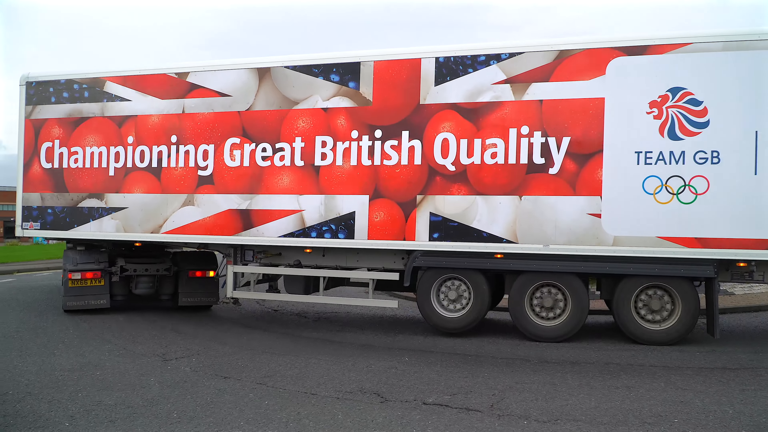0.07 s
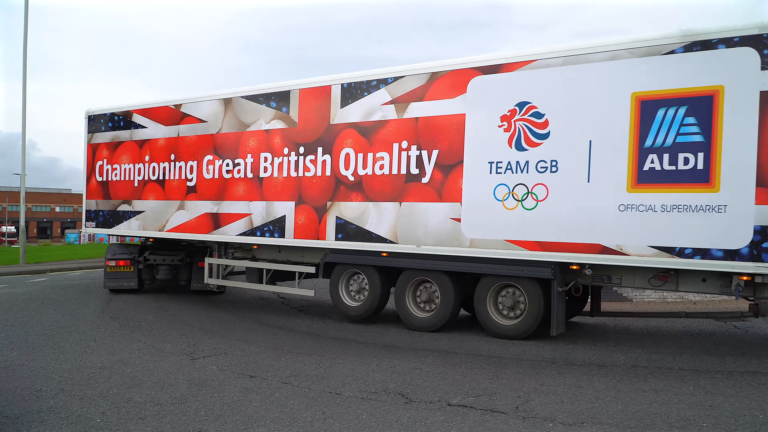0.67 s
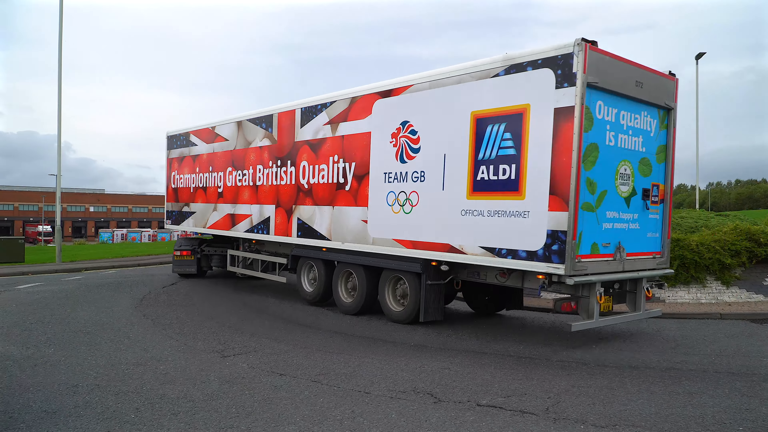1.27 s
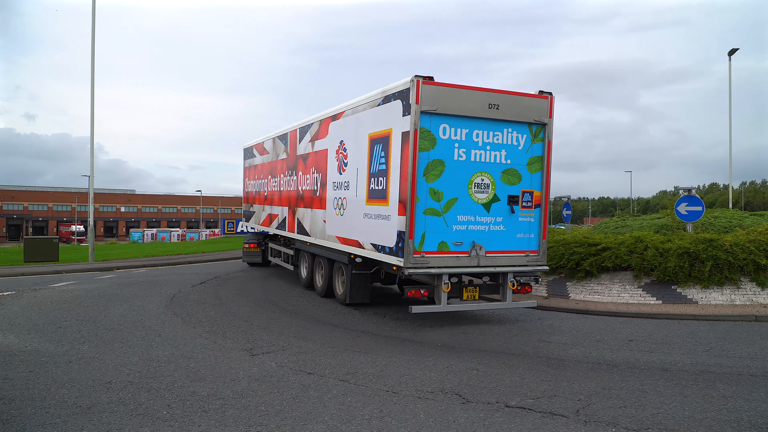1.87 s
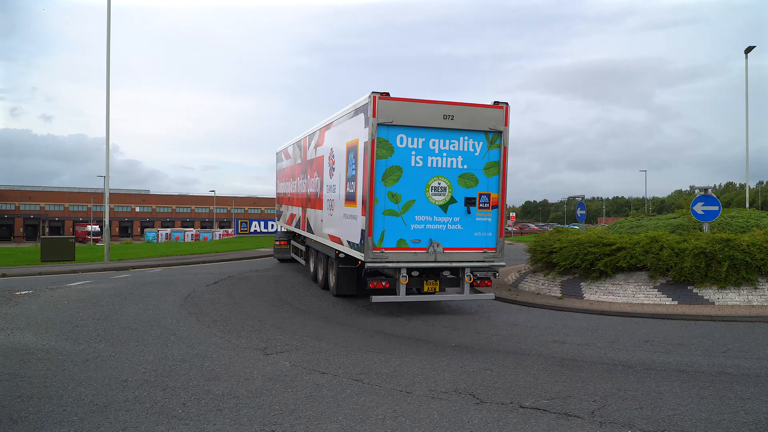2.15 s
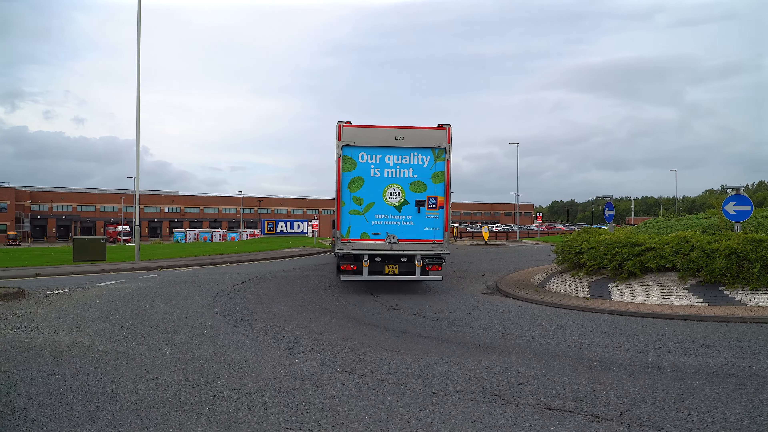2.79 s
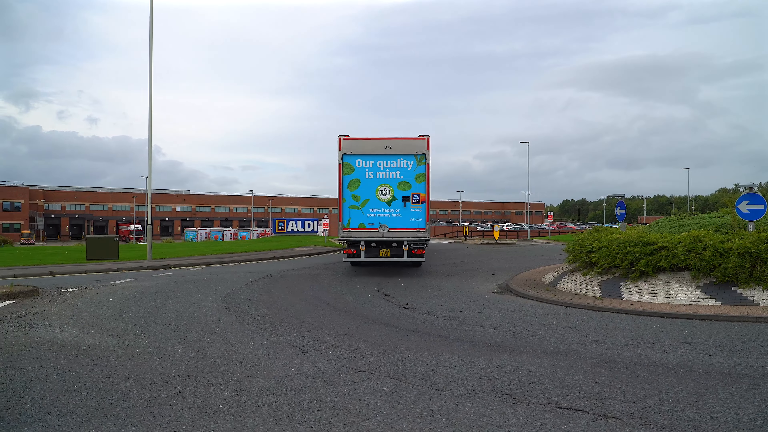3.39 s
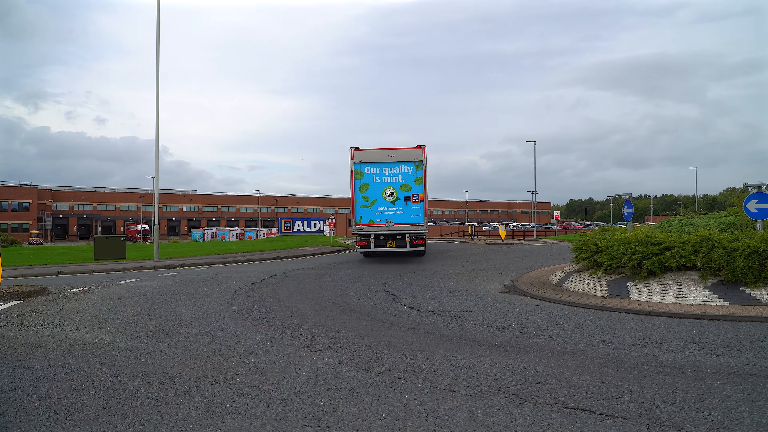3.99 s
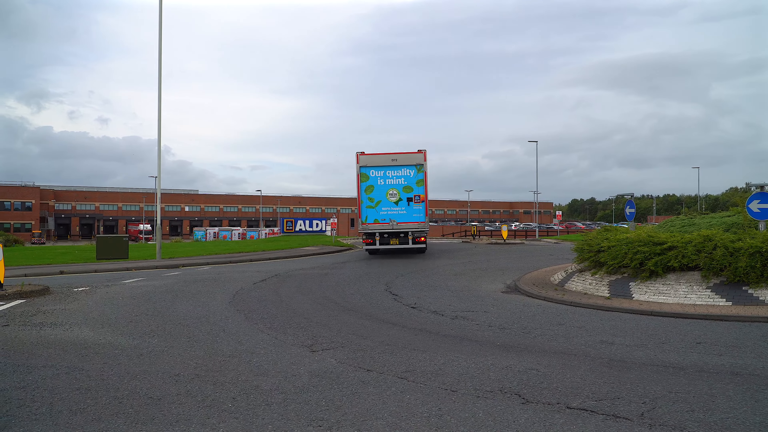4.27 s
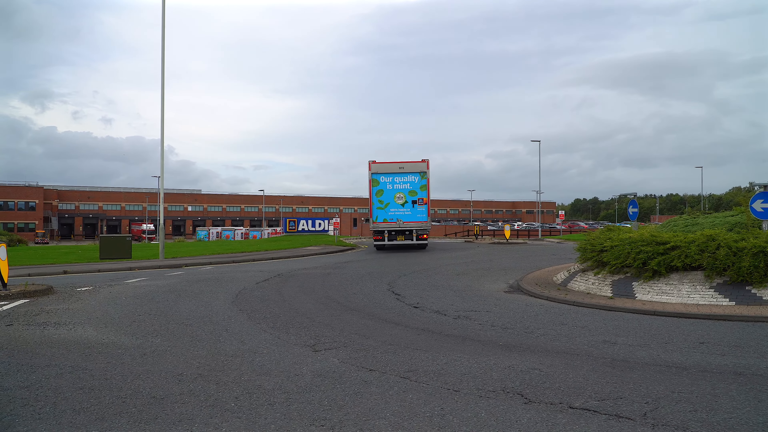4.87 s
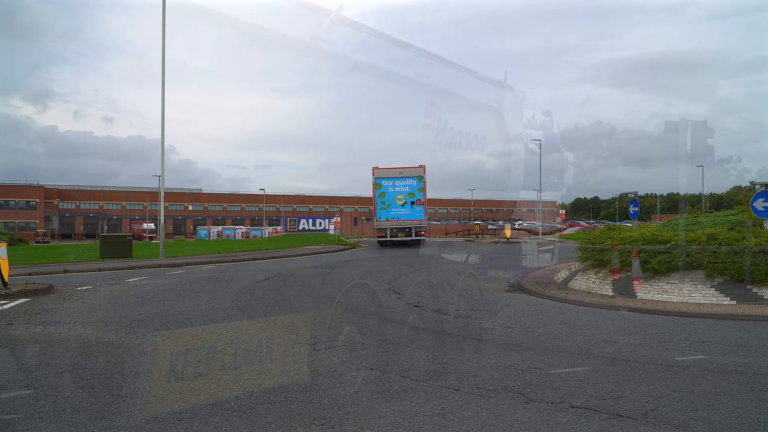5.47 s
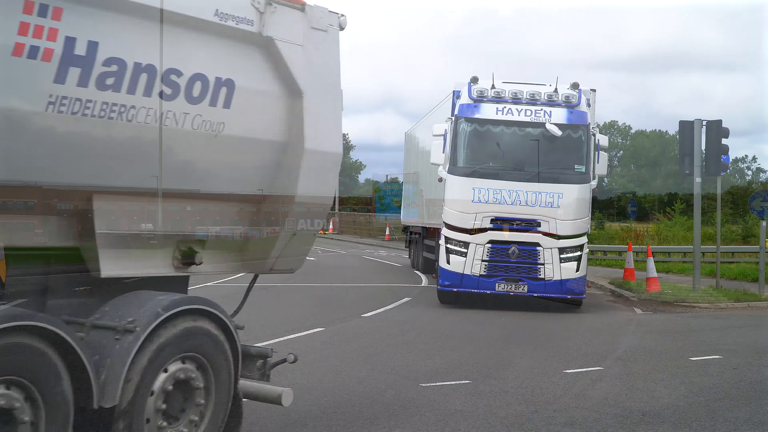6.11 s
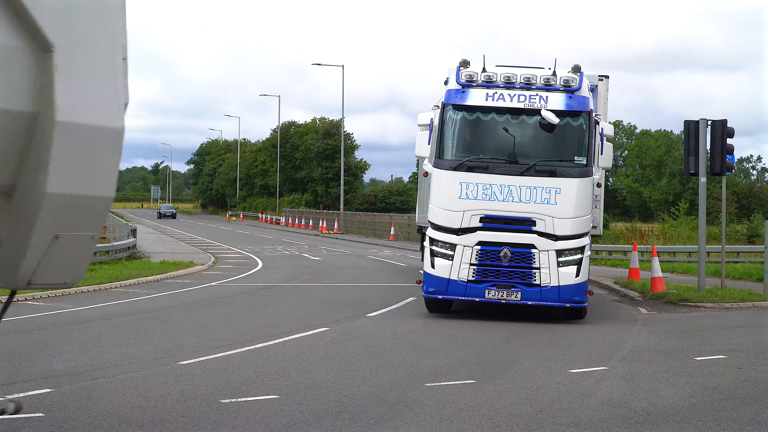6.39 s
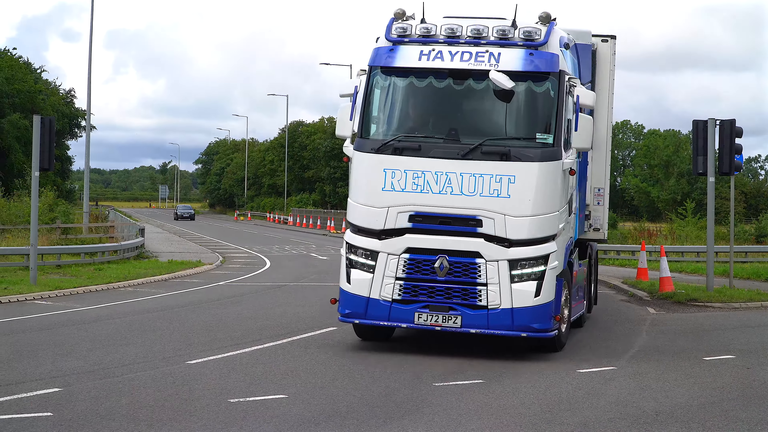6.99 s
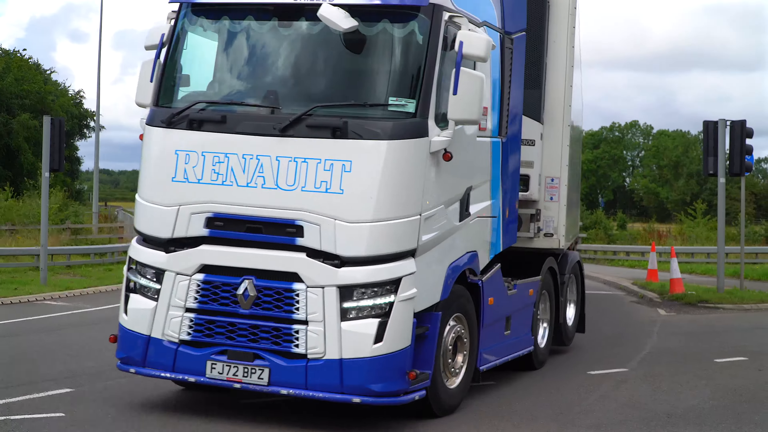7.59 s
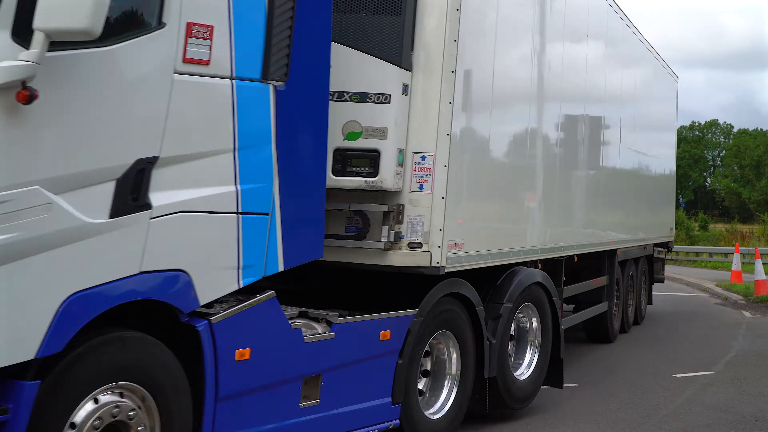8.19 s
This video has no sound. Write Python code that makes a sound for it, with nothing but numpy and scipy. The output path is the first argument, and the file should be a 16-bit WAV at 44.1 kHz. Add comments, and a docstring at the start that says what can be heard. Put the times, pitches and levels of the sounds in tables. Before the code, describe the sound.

Wind thumps the microphone as a clanking lorry recedes, followed by louder tyre roar and diesel drone from two close lorries.

```python
"""Diesel lorries at a windy roundabout.

A lorry pulls away round the bend, tyres singing in stick-slip and trailer panels ringing, while eddies
buffet the microphone and a far diesel ticks over. This dissolves to a closer spot: a tipper rolls past
on the left and a refrigerated lorry nears, its engine gathering speed. Exhausts sound at multiples of
their firing rates; tyres make broadband noise that weakens with distance."""
import sys
import numpy as np
from scipy import signal
from scipy.fft import rfft, irfft
from scipy.io import wavfile
from scipy.ndimage import uniform_filter1d, minimum_filter1d

SR = 44100
rng = np.random.default_rng(int(sys.argv[2]) if len(sys.argv) > 2 else 0)


def transcribe(u):
    """Save the signal u as a 16-bit wav file named by the first command-line argument.

    u: samples, shape (n,) or (channels, n), limited to [-1, 1]; the rate is SR.
    q: integer samples, one column per channel.
    """
    v = np.clip(np.atleast_2d(u).T, -1, 1)
    q = np.round(v * 32767).astype(np.int16)
    wavfile.write(sys.argv[1], SR, q)


N = 363825
TIME, FREQS = np.arange(N) / SR, np.fft.rfftfreq(N, 1 / SR)

# straight paths past the microphone: nearest_m, speed_m_per_s
LEAVING_PATH, TIPPER_PATH, NEARING_PATH = (8.38, 5.82), (3.8, 6.8), (8.2, 3.7)
# sound from ahead at the two microphone ports: frequency_hz, coherence, left_over_right_db, left_lead_rad
FRONTAL_PORTS = [(60, 1, 1, 0), (304, 0.89, 2, 0.0092), (1200, 1, 1, 0.011), (3060, 0.59, 1.5, 0),
                 (7000, 0.49, 0, 0), (15000, 0.091, 1, 0.0012)]
# sound from the side: the same columns
OBLIQUE_PORTS = [(60, 1, 10, 1.5), (154, 0.22, -0.5, -1), (597, 0.55, 4.5, 0.04), (1340, 0.92, -0.5, 0.94),
                 (2600, 0.4, 2, 1.44), (4740, 0.45, -0.5, 3), (9100, 0.24, 3, 8.5), (15200, 0.35, 4, 12.5)]
# spectrum of wind pressure: frequency_hz, density_db
WIND_COLOUR = [(6, -12), (13, 0), (26, 1), (45, -6.5), (68, -14), (100, -25), (200, -38), (500, -60),
               (2000, -100)]
# the approaching engine: time_s, firing_hz, level_db
NEARING_ENGINE = [(6.1, 74, -48), (6.85, 76, -31), (7.2, 78, -31), (7.45, 80.7, -26), (7.7, 82, -27),
                  (7.95, 83.5, -23), (8.1, 84, -23), (8.25, 85.5, -23.5)]


def gain_of(db):
    """Decibels to amplitude."""
    return 10 ** (np.asarray(db) / 20)


def unit_rms(x):
    """Normalisation to rms 1."""
    return x / np.sqrt(np.mean(x ** 2) + 1e-20)


def over_time(rows):
    """Linear interpolation of each column in time."""
    times, *columns = np.transpose(rows)
    return [np.interp(TIME, times, c) for c in columns]


def over_frequency(rows, hz):
    """Interpolation of each column on log frequency."""
    freqs, *columns = np.transpose(rows)
    return [np.interp(np.log(hz + 1), np.log(freqs + 1), c) for c in columns]


def coloured(x, colour):
    """Spectral shaping, to rms 1."""
    return unit_rms(irfft(rfft(x) * gain_of(over_frequency(colour, FREQS)[0]), N))


def wander(width_hz):
    """Random fluctuation: low-pass Gaussian noise of rms 1."""
    return unit_rms(irfft(rfft(rng.standard_normal(N)) * np.exp(-(FREQS / width_hz) ** 2), N))


def panned(side_db):
    """Level difference, left over right, as two gains whose mean is 1."""
    gains = gain_of(np.array([np.atleast_1d(side_db), -np.atleast_1d(side_db)]) / 2)
    return gains / gains.mean(0)


def swell(peak_s, half_s, db):
    """A bell-shaped amplitude envelope."""
    return gain_of(db) / (1 + ((TIME - peak_s) / half_s) ** 2 / 2) ** 2


def passing(path, nearest_s, db, loss_db):
    """Propagation loss: a passing source's level falls by loss_db per doubling of distance."""
    nearest_m, speed = path
    return db - loss_db * np.log2(np.hypot(1, speed * (TIME - nearest_s) / nearest_m))


def narrowband(hz, width_hz):
    """A noisy resonance: random quadrature modulation of a carrier that follows a pitch curve."""
    phase = 2 * np.pi * np.cumsum(hz) / SR
    return wander(width_hz) * np.cos(phase) + wander(width_hz) * np.sin(phase)


def port_noise(colour, ports, patchy_db, flicker_db):
    """Partly coherent noise at two ports, its level uneven in time and frequency."""
    frames, hz = N // 256 + 5, np.fft.rfftfreq(1024, 1 / SR)
    a, b, c, d, patches, flicker = rng.standard_normal((6, frames, len(hz)))
    patches = unit_rms(uniform_filter1d(uniform_filter1d(patches, size=14, axis=0), size=7, axis=1))
    flicker = unit_rms(uniform_filter1d(uniform_filter1d(flicker, size=3, axis=0), size=70, axis=1))
    coherence, side_db, lead_rad = over_frequency(ports, hz)
    coherence = np.clip(coherence, 0, 1)
    left = a + 1j * b
    right = (coherence * left + np.sqrt(1 - coherence ** 2) * (c + 1j * d)) * np.exp(-1j * lead_rad)
    unevenness = gain_of(patchy_db * patches + flicker_db * flicker)
    spectra = np.array([left, right]) * panned(side_db)[:, None] * unevenness
    _, noise = signal.istft(spectra.swapaxes(1, 2), nperseg=1024, noverlap=768)
    return coloured(noise[:, :N], colour)


def rolling_bands(noise, levels_db, splits_hz):
    """Frequency-dependent attenuation: each band carries differently with distance and shielding."""
    lowpasses = [0] + [1 / (1 + (FREQS / hz) ** 8) for hz in splits_hz] + [1]
    bands = [irfft(rfft(noise) * (hi - lo), N) for lo, hi in zip(lowpasses, lowpasses[1:])]
    return [gain_of(db) * band / band.mean(0).std() for db, band in zip(levels_db, bands)]


def ground_dip(noise, start_s=2.4, full_s=3.3, centre_hz=345, width_hz=103, depth_db=-5):
    """Destructive interference: the ground reflection weakens the low mids of a distant source."""
    far = np.clip((TIME - start_s) / (full_s - start_s), 0, 1)
    low_mids = irfft(rfft(noise) * np.exp(-((FREQS - centre_hz) / width_hz) ** 2), N)
    return noise - (1 - gain_of(far * depth_db)) * low_mids


def exhaust(running, orders, roughness, jitter):
    """Engine orders share one crankshaft; uneven combustion modulates their amplitude and pitch."""
    firing_hz, level_db = over_time(running)
    phase = 2 * np.pi * np.cumsum(firing_hz * (1 + jitter * wander(8.64))) / SR
    tone = sum(gain_of(db) * (1 + roughness * wander(5.9)) * np.cos(k * phase + 2 * np.pi * rng.random())
               for k, db in orders)
    return gain_of(level_db) * unit_rms(tone)


def firing_pulses(hz, sharpness):
    """Amplitude modulation by combustion: one crest per firing, rms 1."""
    return unit_rms(np.exp(sharpness * np.cos(2 * np.pi * np.cumsum(hz) / SR)))


def rattle(ticks_per_s=40, spread_db=-1.0):
    """Random impacts of loose fittings, each a brief decay of resonant noise."""
    struck = rng.random((2, N)) < ticks_per_s / SR
    clicks = struck * gain_of(spread_db * np.minimum(rng.exponential(1, (2, N)), 2))
    clicks = clicks + .6 * clicks[::-1]  # each port also hears the other's ticks
    ring = rng.standard_normal(900) * np.exp(-TIME[:900] / .003)
    # resonances of the fittings: frequency_hz, density_db
    colour = [(250, -36), (550, 1.5), (1300, -33), (2000, -4), (2800, -15), (4500, -12.5),
              (9000, -47), (15000, -77)]
    return coloured(signal.oaconvolve(clicks, ring[None])[:, :N], colour)


def trailer_knocks(metal_t60_s=.16):
    """Modal ringing: each blow excites a cluster of damped panel modes and sets loose metal buzzing."""
    # sharp onsets: start_s, level_db, pitch_hz, spread_hz, t60_s; blows on the trailer, except the one at 0.683
    # s, where the level snaps back after a gust
    blows = [(.005, -24.5, 1125, 405, 0.079), (.039, -20.5, 1076, 245, .11), (.055, -20.5, 990, 246, 0.15),
             (.073, -24, 1044, 304, 0.13), (0.093, -22, 1207, 305, 0.1), (.136, -21.5, 1040, 303, .1),
             (.216, -22, 1000, 496, 0.088), (.247, -20.5, 1157, 346, 0.071), (.277, -22, 1270, 150, 0.1),
             (.299, -29, 1280, 150, .08), (.333, -22, 1274, 151, .11), (.364, -19, 1240, 200, 0.072),
             (.385, -25, 1223, 151, .12), (.426, -23.5, 1195, 397, .08), (0.444, -21.5, 1204, 150, 0.1),
             (.478, -27, 1210, 200, .1), (.508, -21, 1210, 250, 0.12), (.586, -21.5, 1126, 198, 0.065),
             (.683, -17.5, 1156, 352, .09), (.755, -16.5, 1094, 346, .09), (.8, -21.5, 1150, 400, 0.1),
             (.929, -26.5, 720, 200, 0.12), (1.045, -27.5, 1110, 300, .1), (1.07, -24, 1080, 302, 0.11),
             (1.116, -28, 750, 300, .1), (1.135, -24, 1280, 251, 0.074), (1.171, -20.5, 860, 450, .09),
             (1.19, -27, 1275, 296, .08), (1.228, -21, 763, 150, 0.085), (1.448, -29, 657, 150, .12),
             (1.645, -24, 700, 301, 0.13), (1.691, -27.5, 1490, 602, 0.11), (1.811, -21.5, 1052, 442, 0.15),
             (1.939, -24.5, 540, 79.6, 0.16), (2.022, -22, 712, 150, 0.076), (2.127, -18, 860, 444, 0.075),
             (2.236, -28, 604, 150, 0.075), (2.569, -27, 360, 30, .18)]
    # modes of the loose metal: pitch_hz, relative_db
    metal_modes = [(1900, -20.5), (2080, -22), (2450, -19.5), (2700, -21), (2990, -18), (3380, -24),
                   (3900, -24)]
    nearest_m, speed = LEAVING_PATH
    age, knocks = TIME[:SR // 2], np.zeros(N)
    for start_s, level_db, pitch_hz, spread_hz, t60_s in blows:
        envelope = (1 - np.exp(-age / .0025)) * gain_of(-60 * age / t60_s)
        cluster_hz = pitch_hz + spread_hz * (np.linspace(-1, 1, 7) + rng.uniform(-.15, .15, 7))
        panel = envelope * sum(np.sin(2 * np.pi * (hz * age + rng.random())) for hz in cluster_hz)
        metal = sum(gain_of(db) * np.sin(2 * np.pi * (hz * rng.uniform(.96, 1.04) * age + rng.random()))
                    for hz, db in metal_modes)
        distance_db = -9 * np.log2(np.hypot(1, start_s * speed / nearest_m))
        metal *= gain_of(distance_db - 60 * age / metal_t60_s)
        onset = round(start_s * SR)
        knocks[onset:onset + len(age)] += gain_of(level_db) * (unit_rms(panel) * envelope.std() + metal)
    return knocks


def tyre_scrub():
    """Stick-slip friction: cornering rubber grips and lets go, singing in short glides."""
    # swells of sideways slip: peak_s, half_length_s, pitch_hz, glide_hz_per_s, level_db
    slips = [(0.378, 0.25, 1285, -190, -36), (0.562, .1, 506, 13.5, -38), (1.318, 0.2, 533, 30, -39.5),
             (1.728, 0.31, 1175, 56, -35), (1.723, .2, 622, 62, -35), (2.001, 0.24, 546, 150.5, -35),
             (2.223, 0.12, 637, 80, -40), (2.55, 0.29, 483, -21.5, -46)]
    jerks = unit_rms(gain_of(1.7 * wander(45)))
    song = np.zeros(N)
    for peak_s, half_s, hz, glide, db in slips:
        pitch_hz = hz + glide * np.clip(TIME - peak_s, -.5, .5)
        song += swell(peak_s, half_s, db) * narrowband(pitch_hz, width_hz=.12 * hz)
    return jerks * song


def leaving_lorry():
    """A receding source: tread on uneven asphalt, exhaust and trailer fade with distance."""
    # spectrum of its rolling noise: frequency_hz, density_db
    colour = [(40, -32), (80, 1.5), (140, -8.5), (215, -2.5), (255, -12), (370, -17), (520, -12),
              (670, -11.5), (900, -16), (1260, -12.5), (1650, -22.5), (2200, -32.5), (3200, -32),
              (4900, -38.5), (10900, -62.5), (15500, -99)]
    # rumble, roar, hiss and fizz: loudest_s, level_db, loss_db_per_doubling
    bands = [(2.1, -36, 3.5), (0.92, -30, 7.5), (1.14, -40.5, 7.5), (0.94, -51.5, 13)]
    # swells of the treble: peak_s, half_length_s, relative_db
    fizz_swells = [(2.182, 0.086, -3), (2.65, 0.047, -5), (3.557, .2, 0), (4.35, 0.21, 6), (5.062, .11, 4)]
    # its engine: time_s, firing_hz, level_db
    running = [(0, 55, -49), (1.2, 53, -51), (2.0, 68, -32), (2.4, 71, -34.5), (2.68, 71, -32.5),
               (3.0, 78, -36.5), (3.6, 73.5, -36), (3.97, 74, -34), (4.15, 74, -41), (5.0, 61.4, -41.5),
               (5.9, 59, -45)]
    # exhaust partials: firing_multiple, relative_db
    orders = [(.667, -12), (.833, -2), (1, -4.5), (1.167, -5), (1.332, -7), (1.666, -5), (1.801, -5),
              (2, 2), (2.668, -7), (3, -14), (4, -13), (4.5, -14), (5, -17), (6, -13.5)]
    noise = ground_dip(port_noise(colour, FRONTAL_PORTS, patchy_db=1.23, flicker_db=.96))
    levels_db = [passing(LEAVING_PATH, *band) for band in bands]
    rumble, roar, hiss, fizz = rolling_bands(noise, levels_db, splits_hz=[260, 1800, 5600])
    hiss *= firing_pulses(over_time(running)[0], sharpness=.048)
    fizz *= 1 + sum(swell(*row) for row in fizz_swells)
    pitched = tyre_scrub() + trailer_knocks() + exhaust(running, orders, roughness=.5, jitter=.012)
    fittings = gain_of(passing(LEAVING_PATH, nearest_s=.086, db=-41.5, loss_db=16)) * rattle()
    return rumble + roar + hiss + fizz + fittings + panned(2.9) * pitched


def gust(full_s, hold_s, db, side_db, rise_s=.061, fall_db_per_s=133):
    """Pressure envelope of a gust at each port: linear rise, hold, exponential decay."""
    rise = np.clip(1 + (TIME - full_s) / rise_s, 0, 1)
    return panned(side_db) * rise * gain_of(db - fall_db_per_s * np.maximum(TIME - full_s - hold_s, 0))


def wind(lull_db=-35, flutter_db=-10.5):
    """Turbulence presses hardest on the windward port; strong gusts shed smaller, faster eddies."""
    # gusts on the microphone: full_s, hold_s, level_db, left_over_right_db
    gusts = [(0, 0.09, -9.5, 1), (0.103, 0.018, -7.5, 11), (0.157, 0.029, -3, 10), (0.235, 0.03, -12, -4),
             (0.309, .012, -9, 10), (0.43, 0.025, -9, 5), (0.533, 0.08, -13.5, 3), (0.664, 0.038, -9.5, 12),
             (0.786, 0.033, -11, 5), (0.96, 0.24, -17.5, 5), (1.197, 0.19, -15.5, 4.5),
             (1.46, 0.11, -20, 5), (1.648, 0.035, -15, 5), (1.824, 0.22, -20.5, 9),
             (2.278, 0.02, -14.5, 12), (2.378, 0.072, -13, 5), (2.536, 0.07, -13, 9),
             (2.706, 0.051, -22, 6), (2.832, 0.041, -11.5, 7.5), (3.169, 0.047, -23, 19),
             (4.31, 0.31, -22.5, 7), (4.717, 0.025, -13, 1), (4.823, 0.1, -9, 3), (4.96, 0.069, -11.5, 5),
             (5.11, 0.088, -23.5, -5), (5.391, 0.061, -20, 7), (5.53, 0.16, -19, 8)]
    # spectrum of the small eddies: frequency_hz, density_db
    flutter_colour = [(25, -15), (48, -1), (80, -1.5), (120, -13), (300, -34), (1500, -85)]
    force = np.hypot(gain_of(lull_db) * panned(8.5), np.max([gust(*row) for row in gusts], axis=0))
    eddies = coloured(rng.standard_normal((2, N)) + .7 * rng.standard_normal(N), WIND_COLOUR)
    eddies /= np.sqrt(uniform_filter1d(eddies ** 2, size=3000) + .1)  # steadied, so gusts set the level
    shedding = gain_of(flutter_db) * force.mean(0) ** 1.2
    flutter = shedding * coloured(rng.standard_normal((2, N)), flutter_colour)
    thumps = unit_rms(gain_of(wander(23)))
    return force * (unit_rms(eddies) + thumps * flutter)


def idling_diesel():
    """Combustion knock: noise pulsed at the firing rate is all that carries from a far engine."""
    # the idling engine: time_s, firing_hz, level_db
    running = [(3.6, 45.5, -39), (4.4, 39, -41.5), (5.0, 42, -42), (5.5, 38, -43.5), (6.0, 40, -55)]
    # spectrum of diesel knock: frequency_hz, density_db
    colour = [(150, -7), (260, -9), (380, -9), (540, 7.5), (980, 5), (1270, 10), (1580, -3.5), (2300, -7),
              (2950, 1), (3500, -9), (4500, -19), (7000, -20.5), (15000, -38.5)]
    firing_hz, level_db = over_time(running)
    noise = rng.standard_normal(N) + .74 * rng.standard_normal((2, N))
    return gain_of(level_db) * coloured(noise * firing_pulses(firing_hz, sharpness=.33), colour)


def tipper():
    """A close pass: the exhaust falls in pitch, and the tyres' sizzle dies steeply with distance."""
    # its engine: time_s, firing_hz, level_db
    running = [(5.4, 58, -41), (5.9, 59, -31.5), (6.28, 66.4, -27), (6.53, 55.3, -26), (6.9, 54, -32),
               (7.2, 49.6, -31), (8.25, 48, -47)]
    # exhaust partials: firing_multiple, relative_db
    orders = [(1.667, -11), (2, 2.5), (2.33, 1.5), (4, -9)]
    # spectrum of tyre sizzle: frequency_hz, density_db
    colour = [(4000, -23), (8000, -12), (10000, -1), (12000, 3), (14000, -4), (15700, -10)]
    sizzle_db = passing(TIPPER_PATH, nearest_s=5.56, db=-29, loss_db=25)
    sizzle = gain_of(sizzle_db) * coloured(rng.standard_normal((2, N)), colour)
    return panned(10) * (exhaust(running, orders, roughness=.35, jitter=.0147) + sizzle)


def gear_whine():
    """Meshing teeth radiate a narrow band of noise about a drifting pitch."""
    # the whine: time_s, pitch_hz, level_db
    meshing = [(5.8, 546.2, -28), (6.25, 565, -30), (6.45, 628.5, -30.5), (6.8, 619, -33.5),
               (7.2, 612, -38), (7.7, 617, -31.5), (8.25, 619, -27)]
    pitch_hz, level_db = over_time(meshing)
    return gain_of(level_db) * narrowband(pitch_hz, width_hz=50)


def cooling_unit():
    """Periodic firing in the trailer's cooling unit gives a low harmonic drone."""
    # its engine: time_s, firing_hz, level_db
    running = [(5.5, 44, -36), (6.05, 40, -36), (6.8, 43.4, -30), (7.5, 40, -25.5), (7.95, 41.9, -22.5),
               (8.25, 41.6, -26.5)]
    # harmonics: firing_multiple, relative_db
    orders = [(1, -13), (3, -23.5), (4, -33), (5, -27)]
    return panned(3) * exhaust(running, orders, roughness=.12, jitter=.003)


def nearing_engine():
    """Engine orders rise together as the firing rate climbs."""
    # exhaust partials: firing_multiple, relative_db
    orders = [(1, 0), (1.167, -13), (1.333, -8), (1.5, -18), (2, -2), (2.5, -9), (3, -18), (4, -20)]
    return panned(2.3) * exhaust(NEARING_ENGINE, orders, roughness=.15, jitter=.003)


def turbo_hiss():
    """Flow noise: intake air surges with the throttle, with a brighter spray on top."""
    # surges of air: peak_s, half_length_s, hiss_db, spray_db
    surges = [(6.757, .05, -49, -41), (6.893, 0.078, -36, -39), (7.11, 0.08, -29.5, -46),
              (7.325, .06, -30, -44), (7.6, 0.23, -33.5, -46), (7.834, 0.077, -33.5, -46),
              (8.23, 0.056, -34, -50)]
    # spectra of the hiss and the spray: frequency_hz, density_db
    hiss_colour = [(3000, -19), (5000, -4), (6000, -1.5), (7200, 0.5), (8500, -2), (10000, -10.5),
                   (15000, -22)]
    spray_colour = [(5000, -35), (8000, -6), (9500, 3), (12000, -6), (15500, -16)]
    hiss_gain = np.sqrt(sum(swell(s, half_s, db) ** 2 for s, half_s, db, _ in surges))
    spray_gain = np.sqrt(sum(swell(s, half_s, db) ** 2 for s, half_s, _, db in surges))
    hiss = hiss_gain * port_noise(hiss_colour, OBLIQUE_PORTS, patchy_db=1.5, flicker_db=1.5)
    return hiss + spray_gain * coloured(rng.standard_normal((2, N)), spray_colour)


def close_lorries():
    """Incoherent sources add in power: two lorries' rolling noise, joined by their machinery."""
    # spectrum of the rolling noise: frequency_hz, density_db
    colour = [(47, -13.5), (80, -6), (130, -3.5), (230, -6.5), (390, -8), (520, -4), (700, -3.5),
              (950, -4.5), (1320, -5.5), (1580, -13.5), (2550, -25.5), (4900, -26), (5900, -24.5),
              (7500, -25), (12800, -36.5), (15600, -51)]
    # each lorry's rumble, roar, hiss and fizz: loudest_s, level_db, loss_db_per_doubling
    tipper_bands = [(5.76, -20.5, 5.8), (6.27, -22, 6), (5.49, -28.5, 6.9), (5.12, -25.5, 12.3)]
    nearing_bands = [(9.9, -31, 2), (8.16, -22, 9.7), (12.4, -33.5, 1.1), (7.4, -42, 5)]
    # the swing from the side towards the front: time_s, frontal_share, left_over_right_db
    bearing = [(7.3, 0.13, 3.5), (7.75, 0.41, 2), (8.05, 0.54, 1)]
    going = [gain_of(passing(TIPPER_PATH, *band)) for band in tipper_bands]
    coming = [gain_of(passing(NEARING_PATH, *band)) for band in nearing_bands]
    levels_db = 20 * np.log10(np.hypot(going, coming))
    ahead, side_db = over_time(bearing)
    oblique = port_noise(colour, OBLIQUE_PORTS, patchy_db=1, flicker_db=.5)
    frontal = port_noise(colour, FRONTAL_PORTS, patchy_db=1, flicker_db=.5)
    noise = np.sqrt(1 - ahead) * oblique + np.sqrt(ahead) * frontal
    rumble, roar, hiss, fizz = rolling_bands(noise, levels_db, splits_hz=[360, 1800, 5600])
    roar *= 1 + swell(peak_s=6.23, half_s=.035, db=-14)  # the tipper's last axle rolls by
    clatter = firing_pulses(over_time(NEARING_ENGINE)[0], sharpness=.027)
    above_rumble = (roar + hiss) * clatter + fizz + gear_whine() + turbo_hiss()
    road = panned(side_db) * above_rumble + panned(1.64 * side_db) * rumble
    return road + tipper() + nearing_engine() + cooling_unit()


def scene(dissolve_s=5.425, close_full_s=6.105, far_zero_s=8.8):
    """Superposition: the far scene crossfades into the close one over steady microphone hiss."""
    fade_in = np.clip((TIME - dissolve_s) / (close_full_s - dissolve_s), 0, 1) ** 1.52
    fade_out = np.clip((far_zero_s - TIME) / (far_zero_s - dissolve_s), 0, 1)
    microphone_hiss = gain_of(-67) * rng.standard_normal((2, N))
    far = leaving_lorry() + idling_diesel() + wind()
    close = close_lorries()
    breeze = gain_of(-27) * coloured(rng.standard_normal((2, N)), WIND_COLOUR)
    return fade_out * far + fade_in * (close + breeze) + microphone_hiss


def record(dry, ceiling_db=-.2, recovery_db_per_s=160, cutoff_hz=15720):
    """Peak limiting ducks everything under the hardest gusts; a low-pass filter bounds the band."""
    peak_db = 20 * np.log10(abs(dry).max(0) + 1e-9)
    fall_db = TIME * recovery_db_per_s
    held_db = np.maximum.accumulate(peak_db + fall_db) - fall_db
    over_db = np.maximum(held_db - ceiling_db, 0)
    duck_db = minimum_filter1d(-over_db, size=400)  # starts to duck just ahead of the peak
    duck_db = uniform_filter1d(uniform_filter1d(duck_db, size=200), size=200)
    soft_start = np.minimum(TIME / .004, 1)
    lowpass = signal.firwin(511, cutoff_hz, window=("kaiser", 9), fs=SR)
    return signal.oaconvolve(soft_start * dry * gain_of(duck_db), lowpass[None], "same")


dry = scene()
out = record(dry)
transcribe(out)
```